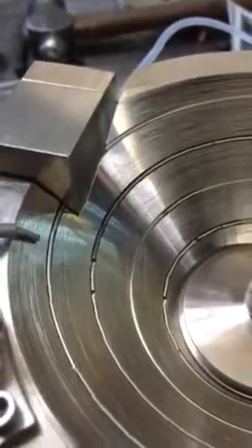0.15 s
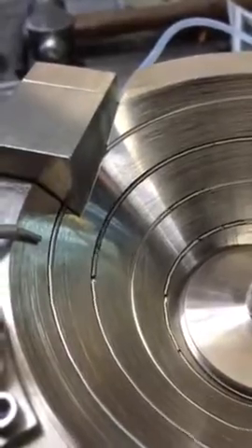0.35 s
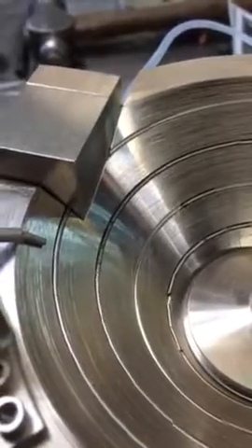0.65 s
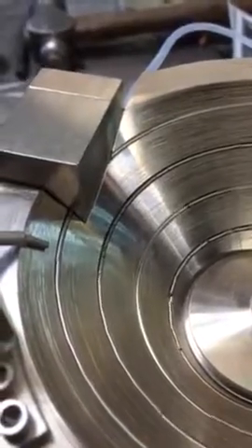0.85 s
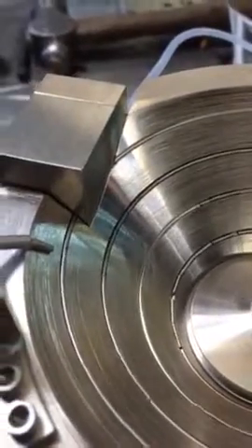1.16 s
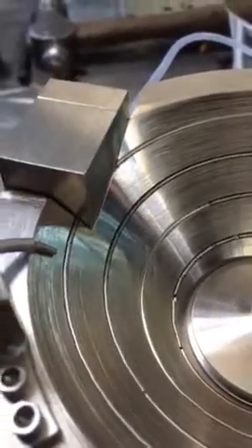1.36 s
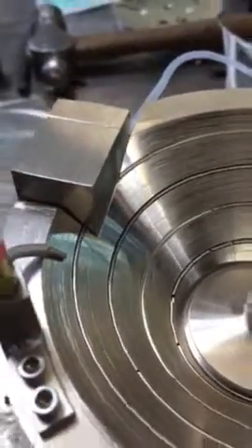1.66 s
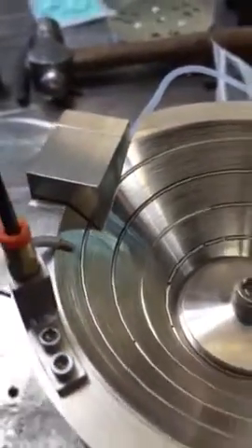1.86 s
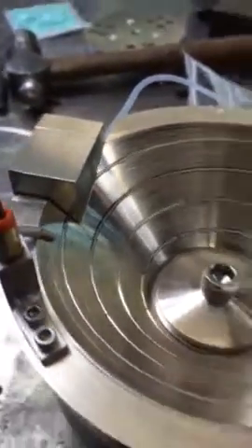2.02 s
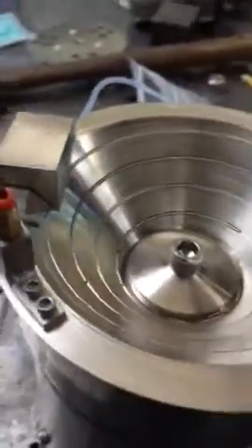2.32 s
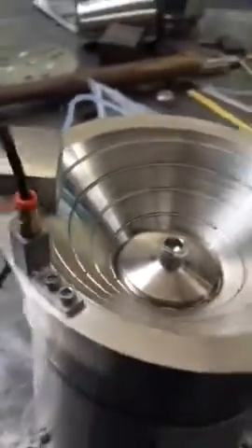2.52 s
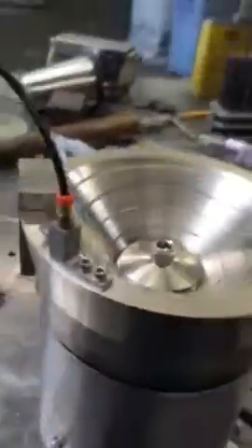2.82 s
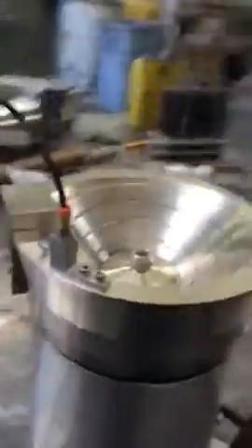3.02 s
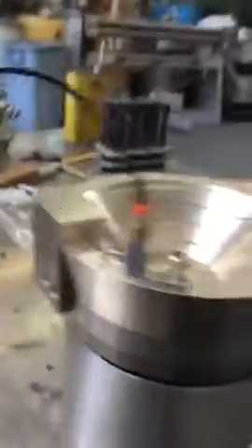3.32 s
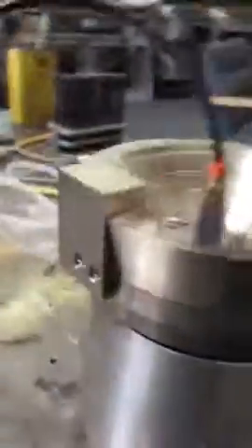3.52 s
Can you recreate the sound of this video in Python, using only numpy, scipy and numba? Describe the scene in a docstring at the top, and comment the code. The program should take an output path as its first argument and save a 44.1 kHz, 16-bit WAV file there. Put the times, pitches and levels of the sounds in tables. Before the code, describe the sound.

A steady, shrill hiss of leaking air, with a machine humming low beneath it.

```python
"""Quiet workshop: compressed air leaks steadily from the air line of a steel bowl feeder.
The feeder's magnet drive hums, pulling twice per mains cycle. The jet's shrill top is beamed and fades
as the listener steps back; the gap whistles, and reflections off the steel cut two moving notches.
Soft scuffs, probably shoes and clothing, come with the step."""
import sys
import numpy as np
from scipy import signal
from scipy.fft import rfft, irfft
from scipy.io import wavfile
from scipy.ndimage import uniform_filter1d
from numba import njit

SR = 44100
rng = np.random.default_rng(int(sys.argv[2]) if len(sys.argv) > 2 else 0)


def unload_wav(signal):
    """Save mono or channel-first audio to the path in sys.argv[1] as 16-bit WAV at rate SR, clipped to [-1, 1]."""
    wavfile.write(
        sys.argv[1],
        SR,
        np.round(np.clip(np.atleast_2d(signal).T, -1, 1) * 32767).astype(np.int16),
    )


N = 162288

# hiss beside the bowl, before resonances (frequency [Hz], relative density [dB])
CLOSE_SPECTRUM = [(500, -31), (1100, -22.5), (1900, -13), (2400, -6), (3100, -5.5), (4200, -4.5),
                  (6300, -3.5), (8200, 0), (10200, -2), (11000, 0.5), (15700, -1.5)]
# gap and bowl resonances (frequency [Hz], width [Hz], lift [dB])
BOWL_RESONANCES = [(4270, 210, 5), (5290, 610, 6.5), (5940, 150, 4.5), (7380, 1050, 6.5), (8620, 270, 5.5),
                   (9420, 340, 9), (9815, 340, 7), (10530, 220, 7)]
# beamed top of the jet (frequency [Hz], relative density [dB])
SHRILL_SPECTRUM = [(9500, -45), (10950, -16), (11480, 0), (12050, 0), (12700, -2), (13150, -2.6),
                   (13650, -5.2), (14300, -1.8), (15000, -5.8), (15700, -6.5)]
# hiss a step away, off axis (frequency [Hz], relative density [dB])
OFF_AXIS_SPECTRUM = [(600, -22.5), (1000, -21.5), (1500, -16), (2150, -13.5), (2700, -9), (3200, -14),
                     (4200, -1), (5250, -3), (6300, -5.5), (7650, -2.5), (8700, -3), (9600, -1),
                     (10450, 0.5), (11700, -3.5), (12500, 3), (13300, -8), (15600, -14)]
# hiss as the listener moves (time [s], close [dB], shrill [dB], off-axis [dB])
HISS_LEVELS = [(0, -40, -35.5, -57), (.7, -40.5, -35.5, -51.5), (1.65, -40, -35, -61),
               (2.15, -43, -38, -49.5), (2.45, -43, -36.5, -45.5), (2.75, -44, -38.5, -47.5),
               (2.98, -46, -40, -45.5), (3.1, -50, -48, -43.5), (3.33, -61, -52, -43),
               (3.47, -47, -51, -44), (3.68, -43.5, -71, -47.5)]
# breathy gap whistle (frequency [Hz], relative density [dB])
WHISTLE_SPECTRUM = [(4000, -33), (4750, -15), (5050, -6), (5400, -6), (5750, -9), (6600, -43)]
# whistle, loudest half a step back (time [s], level [dB])
WHISTLE_LEVELS = [(0, -62), (2.2, -70), (2.55, -63), (2.9, -53), (3.2, -55.5), (3.68, -72)]
# cancellations by reflection off the steel (time [s], frequency [Hz], depth [0-1])
LOW_NOTCH = [(0, 3460, 0.87), (1.7, 3560, .78), (2.17, 3850, 0.93), (2.33, 3900, 0.7), (2.42, 4400, 0.93),
             (2.75, 4420, 0.66), (3.25, 4670, 0.55), (3.68, 4900, 0.4)]
HIGH_NOTCH = [(0, 8300, 0.21), (2.1, 7940, 0.23), (2.52, 7600, 0.74), (2.8, 7660, .25), (3.0, 6840, 0.5),
              (3.45, 6450, 0.33), (3.68, 6460, .2)]
# drive hum (harmonic [x DRIVE_HZ], level [dB])
HUM_HARMONICS = [(1, -46.5), (2, -61), (3, -65), (4, -81.5), (5, -78.5), (7, -80), (9, -83), (11, -79.5),
                 (12, -82.5)]
# hum envelope (time [s], gain [dB])
HUM_GAINS = [(0, 0), (1.4, 0.1), (3.0, -0.8), (3.3, -2.5), (3.68, -2)]
# workshop background (frequency [Hz], relative density [dB])
SHOP_SPECTRUM = [(20, -16), (31, -6), (40, 8.5), (48, -9), (60, 2.5), (75, -7.5), (100, -1), (170, -11),
                 (400, -18), (700, -18.5), (1200, -22), (3000, -31.5)]
# rubs (start [s], length [s], body [dB], rasp [dB], creak frequency [Hz], creak [dB])
SCUFF_EVENTS = [(2.604, 0.026, -74, -58.5, 1783, -62), (2.719, 0.019, -56, -56, 1976, -55),
                (2.75, 0.18, -67.5, -64, 650, -69.5), (2.938, 0.066, -59, -58.5, 523, -66),
                (3.018, 0.061, -55.5, -57.5, 286, -58), (3.073, 0.11, -60.5, -58.5, 430, -55),
                (3.18, 0.038, -60, -57.5, 685, -61), (3.25, 0.091, -69, -79, 447, -66),
                (3.524, 0.02, -57, -65, 896, -58), (3.628, .05, -69, -59.5, 1640, -66)]
# dull body and gritty rasp of a rub (frequency [Hz], relative density [dB])
BODY_SPECTRUM = [(100, -9), (250, -8.5), (450, 0), (560, -10), (660, -1), (850, -6.5), (1100, -27),
                 (2500, -30)]
RASP_SPECTRUM = [(400, -1), (800, -1), (1100, -7), (1350, -0.5), (1650, 0.5), (2100, -2), (3000, -7.5),
                 (6000, -24)]

NOTCH_WIDTH_HZ, FLUTTER_DB = 680.0, 0.3
DRIVE_HZ = 120
SHOP_DB = -64
SCUFF_ATTACK_S, SCUFF_RELEASE_S, CREAK_WIDTH_HZ, GRIP_DB = 0.0053, 0.019, 72.0, 1.4
ROOM_T60_S, HISS_WET_DB, SCUFF_WET_DB = 0.2, -11.5, -1.5
CUTOFF_HZ = 15750


def undb(db):
    """Decibels to gain."""
    return 10 ** (np.asarray(db) / 20)


def unit_rms(x):
    """Scale to rms 1."""
    return x / np.sqrt(np.mean(x ** 2))


def curve(rows, column=1):
    """Table column, linearly interpolated in time."""
    rows = np.array(rows)
    return np.interp(np.arange(N) / SR, rows[:, 0], rows[:, column])


def noise(spectrum, resonances=()):
    """Coloured noise, lifted at its resonances; rms 1."""
    freq_hz = np.arange(N // 2 + 1) * SR / N
    points = np.array(spectrum)
    shape_db = np.interp(np.log(np.maximum(freq_hz, 1)), np.log(points[:, 0]), points[:, 1])
    for centre_hz, width_hz, lift_db in resonances:
        shape_db += lift_db * .5 ** ((2 * (freq_hz - centre_hz) / width_hz) ** 2)
    return unit_rms(irfft(rfft(rng.standard_normal(N)) * undb(shape_db), N))


def wander(rate_hz):
    """Smoothed random steps; rms 1."""
    hold = max(int(SR / rate_hz), 1)
    steps = np.repeat(rng.standard_normal(N // hold + 1), hold)
    return unit_rms(uniform_filter1d(uniform_filter1d(steps, hold), hold)[:N])


@njit
def bandpass(x, centre_hz, width_hz):
    """State-variable band-pass, moving centre."""
    y = np.empty(len(x))
    band_state, low_state = 0., 0.
    for i in range(len(x)):
        g = np.tan(np.pi * centre_hz[i] / SR)
        damping = width_hz / centre_hz[i]
        band = (band_state + g * (x[i] - low_state)) / (1 + g * (g + damping))
        band_state = 2 * band - band_state
        low_state += 2 * g * band
        y[i] = damping * band
    return y


def room(x, wet_db):
    """Mix in the short scattered tail of a cluttered workshop."""
    time_s = np.arange(SR // 2) / SR
    tail = rng.standard_normal(len(time_s)) * np.exp(-np.log(1000) * time_s / ROOM_T60_S)
    reverb = signal.fftconvolve(x, tail / np.linalg.norm(tail))[:N]
    wet = undb(wet_db)
    return (x + wet * reverb) / np.hypot(1, wet)


def air_leak():
    """Turbulent jet: close hiss and beamed top yield to duller off-axis hiss; reflections notch it."""
    close = noise(CLOSE_SPECTRUM, BOWL_RESONANCES) * undb(curve(HISS_LEVELS, column=1))
    shrill = noise(SHRILL_SPECTRUM) * undb(curve(HISS_LEVELS, column=2))
    off_axis = noise(OFF_AXIS_SPECTRUM) * undb(curve(HISS_LEVELS, column=3))
    whistle = noise(WHISTLE_SPECTRUM) * undb(curve(WHISTLE_LEVELS))
    hiss = close + shrill + off_axis + whistle
    for notch in (LOW_NOTCH, HIGH_NOTCH):
        centre_hz, depth = curve(notch), curve(notch, column=2)
        hiss -= depth * bandpass(hiss, centre_hz, NOTCH_WIDTH_HZ)
    flutter = undb(FLUTTER_DB * wander(rate_hz=25.1))
    return room(hiss * flutter, HISS_WET_DB)


def magnet_drive():
    """Two pulls per mains cycle: steady hum, thin overtones."""
    phase_rad = 2 * np.pi * DRIVE_HZ * np.arange(N) / SR
    hum = sum(undb(level_db) * np.sin(harmonic * phase_rad + rng.uniform(0, 2 * np.pi))
              for harmonic, level_db in HUM_HARMONICS)
    return np.sqrt(2) * hum * undb(curve(HUM_GAINS))


def workshop():
    """Faint, steady low rumble."""
    return undb(SHOP_DB) * noise(SHOP_SPECTRUM)


def scuffs():
    """Short uneven rubs: dull body, gritty rasp, one creaking resonance each."""
    time_s, rubs = np.arange(N) / SR, np.zeros(N)
    body, rasp = noise(BODY_SPECTRUM), noise(RASP_SPECTRUM)
    for start_s, length_s, body_db, rasp_db, creak_hz, creak_db in SCUFF_EVENTS:
        attack = np.clip((time_s - start_s) / SCUFF_ATTACK_S, 0, 1)
        release = np.clip((start_s + length_s - time_s) / SCUFF_RELEASE_S + .5, 0, 1)
        centre_hz = np.full(N, float(creak_hz))
        band = bandpass(rng.standard_normal(N), centre_hz, CREAK_WIDTH_HZ)
        creak = unit_rms(bandpass(band, centre_hz, CREAK_WIDTH_HZ))
        rubs += attack * release * (undb(body_db) * body + undb(rasp_db) * rasp + undb(creak_db) * creak)
    grip = undb(GRIP_DB * wander(rate_hz=140))
    return room(rubs * grip, SCUFF_WET_DB)


def scene():
    """All sources, same in both channels."""
    mono = air_leak() + magnet_drive() + workshop() + scuffs()
    return np.array([mono, mono])


def record(dry):
    """Steep elliptic low-pass."""
    lowpass = signal.ellip(16, rp=.1, rs=75, Wn=CUTOFF_HZ, fs=SR, output="sos")
    return signal.sosfilt(lowpass, dry)


dry = scene()
out = record(dry)
unload_wav(out)
```